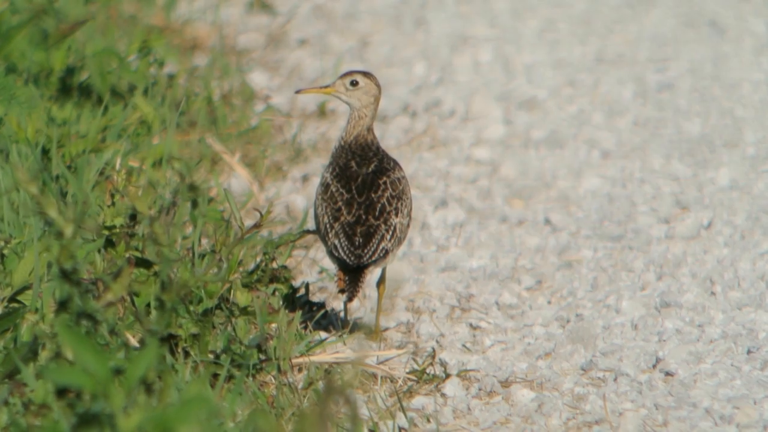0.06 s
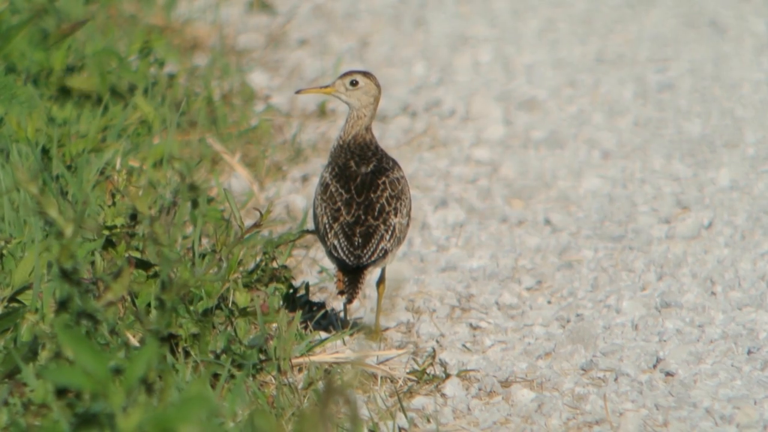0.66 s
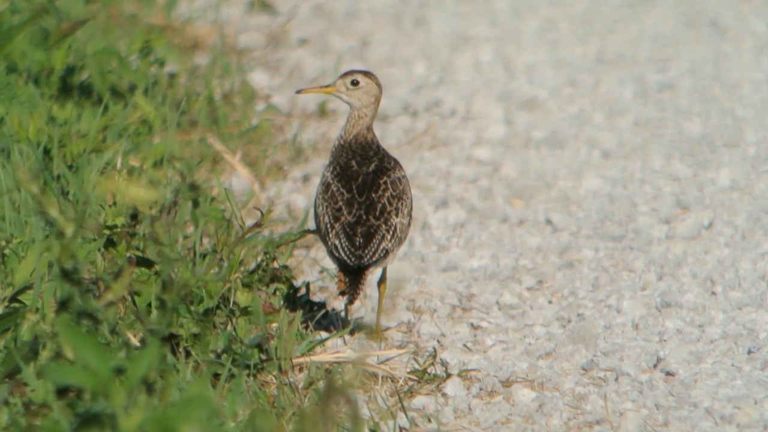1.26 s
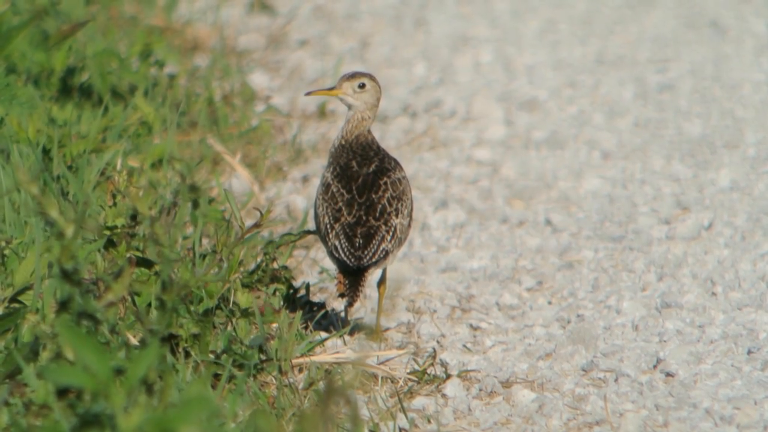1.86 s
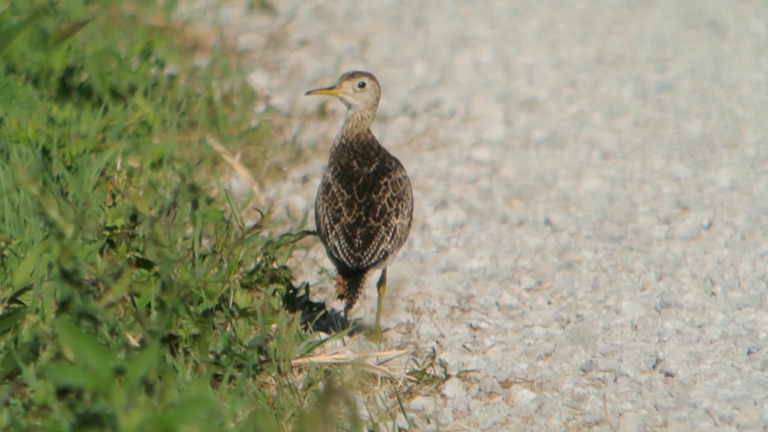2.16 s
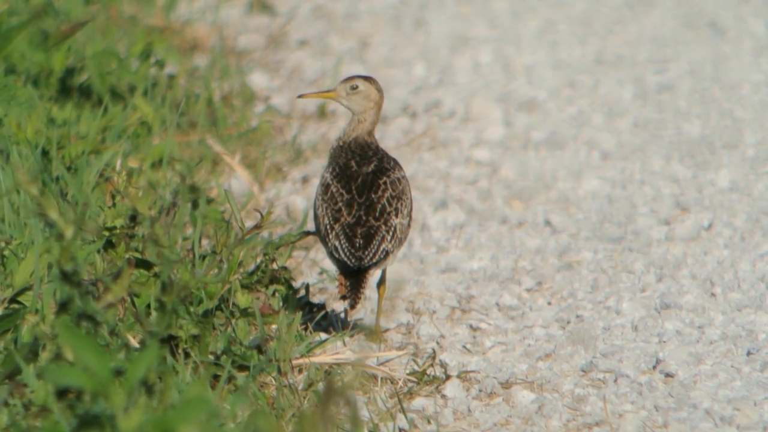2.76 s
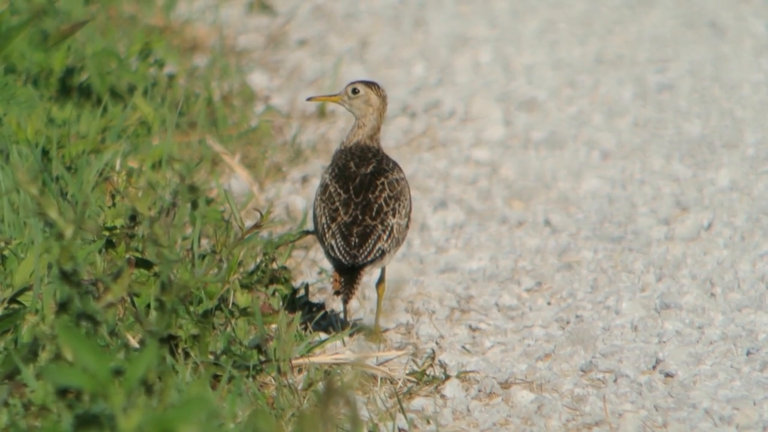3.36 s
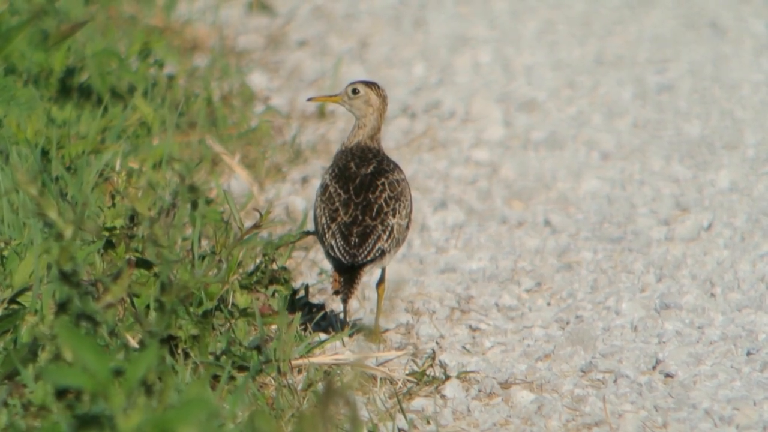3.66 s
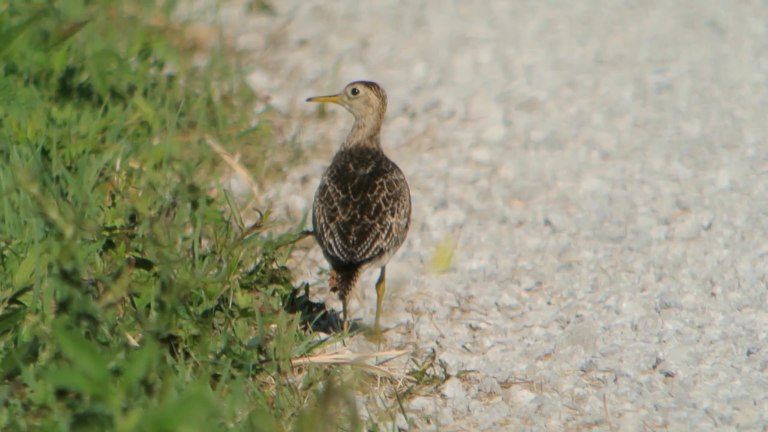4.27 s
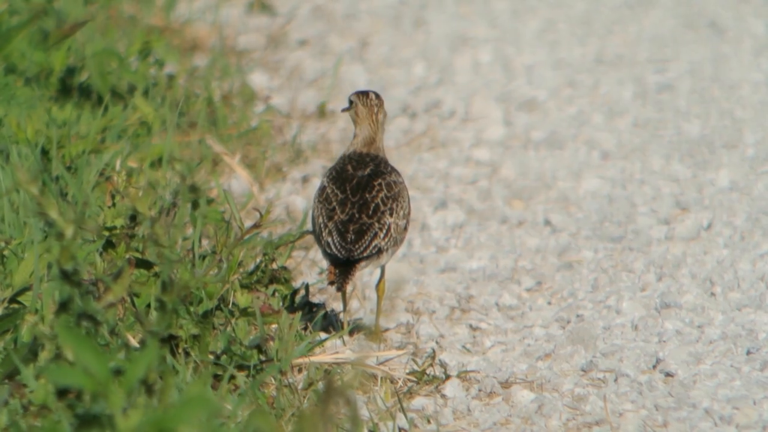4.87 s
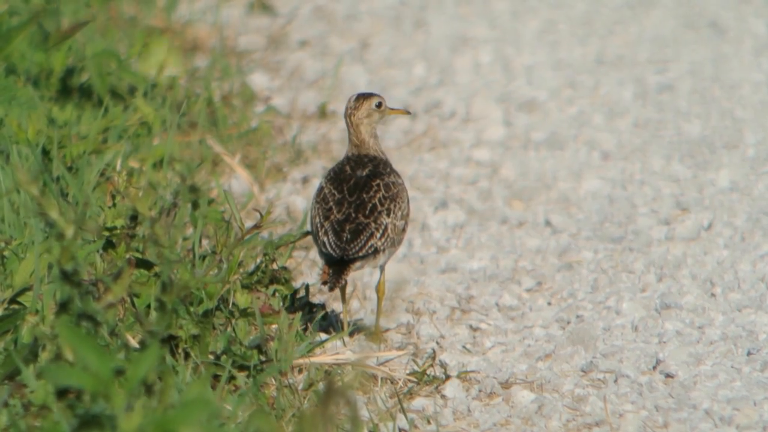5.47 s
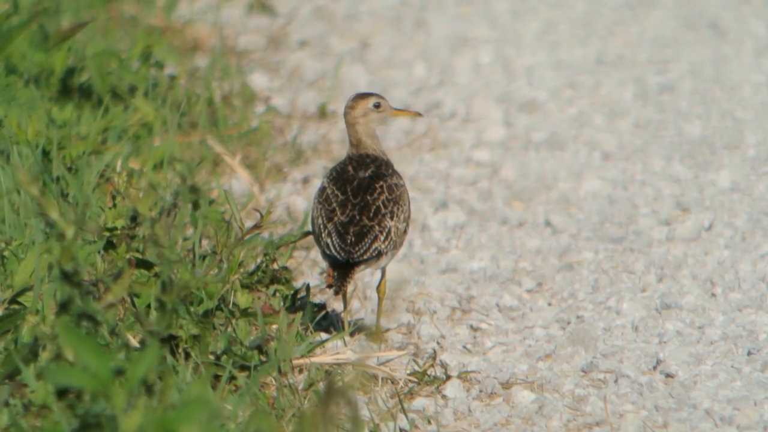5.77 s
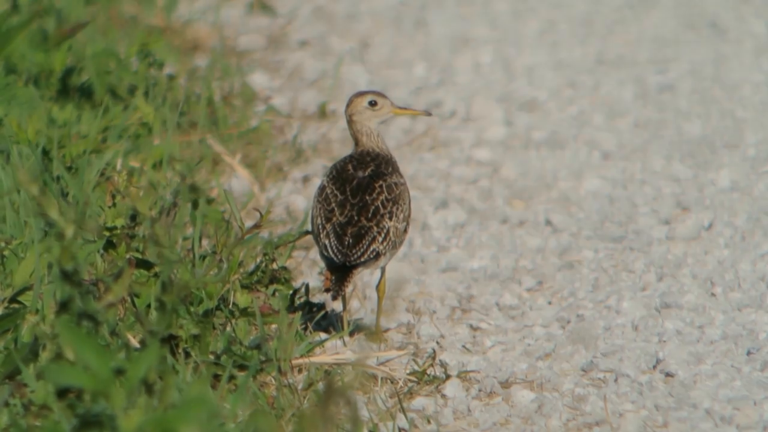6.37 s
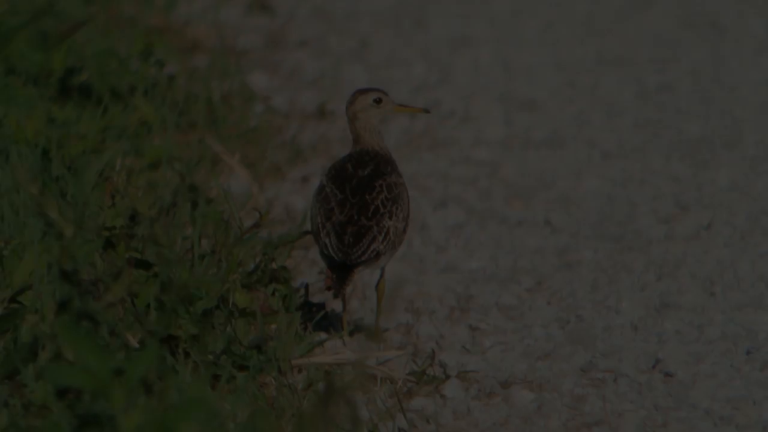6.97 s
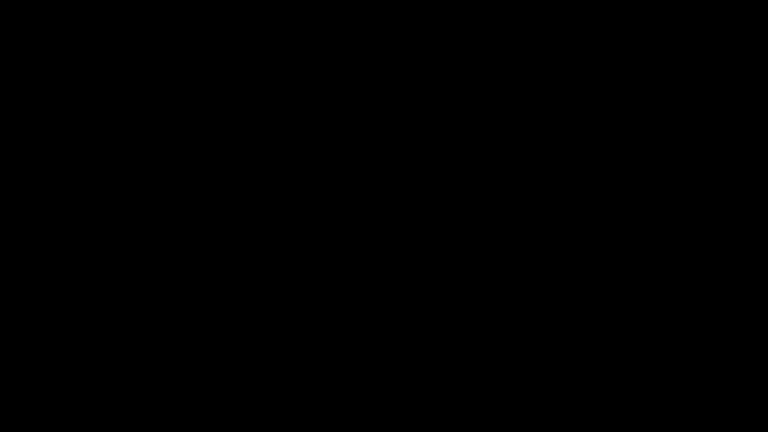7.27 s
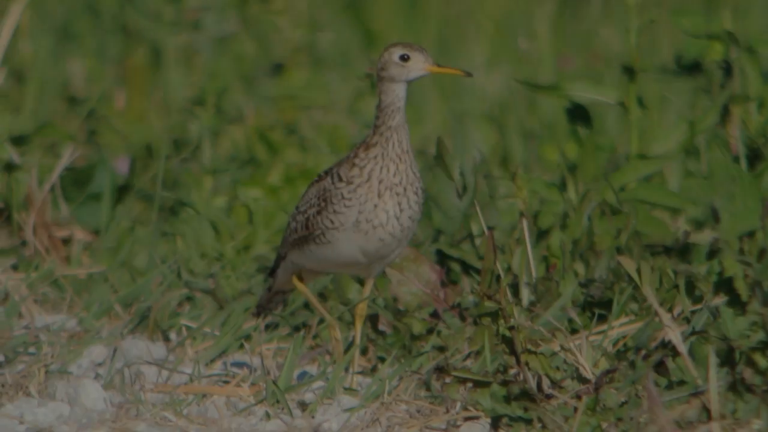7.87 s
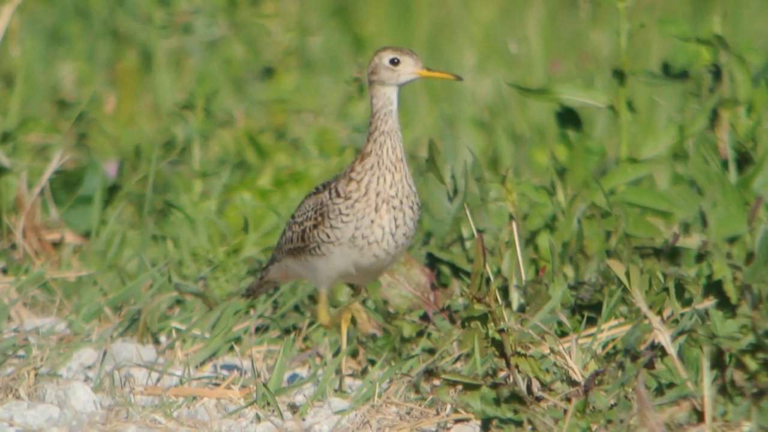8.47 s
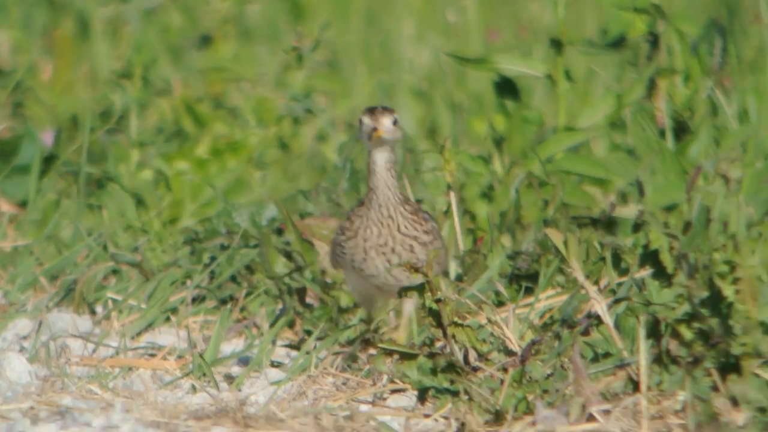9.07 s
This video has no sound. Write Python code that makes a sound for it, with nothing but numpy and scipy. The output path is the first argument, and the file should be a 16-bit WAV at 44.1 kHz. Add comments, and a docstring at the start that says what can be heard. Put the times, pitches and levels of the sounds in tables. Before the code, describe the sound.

Small birds twitter and chip over faint insects and wind bumps; the sound fades out, then returns with a closer bird piping rapid notes.

```python
"""Small birds by a grassland track

Birds twitter, chip and buzz in quick, quivering whistles around a gravel track, over bands of
insect noise and far trills. Puffs of wind bump the microphones. The sound fades out and in on a
closer spot, where one bird pipes a fast series of arched notes while another twitters across it."""
import sys
import numpy as np
from scipy import signal
from scipy.fft import rfft, irfft, next_fast_len
from scipy.io import wavfile
from scipy.ndimage import uniform_filter1d

SR = 44100
rng = np.random.default_rng(int(sys.argv[2]) if len(sys.argv) > 2 else 0)


def unload_audio(sound):
    """Save the sound as a 16-bit wav file, at the path given as the first command line argument."""
    columns = np.transpose(np.atleast_2d(sound))
    # keep every value between -1 and 1, then stretch to whole-number steps
    steps = np.round(np.clip(columns, -1, 1) * 32767)
    wavfile.write(sys.argv[1], SR, steps.astype(np.int16))


N = 401751
T = np.arange(N) / SR

# Tone of the air over the field. Each row: frequency in Hz, relative level in dB.
AIR_SPECTRUM = [(88, -1.5), (150, -32), (285, -4.5), (1610, -5.5), (3510, -4.5), (5200, -0.5), (6000, -6.5),
                (15000, -13)]
# Slow swells of the bed. Each row: time in seconds, air level in dB, wind rumble level in dB.
WEATHER = [(0, -52, -71), (1.7, -57, -68.5), (2.9, -54.5, -62.5), (5.497, -55.5, -60), (7.2, -59, -67.5),
           (7.699, -56, -38), (8.3, -55, -52), (9.1, -53, -53.5)]
# Insect choirs. Each row: centre in Hz, width in Hz, level in dB.
INSECT_BANDS = [(5390, 290, -83), (3607, 340, -67.5)]
# Far trills. Each row: start and length in seconds, pitch in Hz, notes per second, level in dB.
TRILLS = [(0, 0.48, 2620, 77, -52.5), (3.035, 0.44, 2770, 52, -55), (8.079, 0.085, 3470, 95, -47),
          (8.193, 0.81, 2713, 35.7, -53)]
# Three twitter songs. Each row is a syllable: end in seconds, first and last pitch in Hz,
# flick height as a share of the pitch, relative level in dB.
TUMBLE = [(.022, 7800, 7500, 0.16, -9), (.033, 8300, 7200, 0.12, -6), (.04, 9750, 7100, 0.089, -1.5),
          (.051, 4100, 5300, 0.043, -0.5), (.061, 5000, 4640, 0, -2), (.07, 6650, 7000, 0.0056, -1),
          (.077, 6340, 5900, .25, -3), (.086, 5100, 5760, 0.097, -0.5), (.125, 4400, 2430, .1, -5.5)]
CASCADE = [(.009, 8280, 7800, 0.043, -3.5), (.015, 7720, 7630, 0.314, 0), (.03, 9680, 8170, 0, -5.5),
           (.038, 8200, 7625, 0.183, 3.5), (.058, 5010, 4780, .25, -1), (.065, 4520, 4560, 0.015, -1.5),
           (.072, 6700, 6900, 0, 1.5), (.083, 5970, 5820, 0.21, 0), (.089, 5470, 5970, 0, 4.5),
           (.125, 4400, 2320, .04, -4.5)]
TWITTER = [(.01, 8200, 7450, 0, -9), (.016, 7100, 10200, 0, -3.5), (.036, 8330, 7940, .04, -3),
           (.043, 6800, 8760, 0, 0.5), (.058, 8250, 7300, 0.087, 0), (.072, 4750, 4330, 0.34, -7),
           (.082, 4540, 4670, 0.012, -3.5), (.092, 6600, 6300, 0, -1.5), (.103, 5380, 5360, 0.24, -4.5),
           (.112, 4870, 5140, 0.024, -3.5), (.14, 4400, 3130, .035, -6.5)]
# Bouts of twitters. Each row: song, pan in dB (left minus right), pitch factor,
# calls as pairs of start in seconds and level in dB.
BOUTS = [(TUMBLE, 5.3, 0.96, [(.105, -52), (.172, -47), (.339, -42.5), (.498, -40), (.659, -39.5),
         (.827, -40.5)]), (CASCADE, -3.5, 0.92, [(1.7, -49), (1.861, -49.5), (2.027, -49.5)]),
         (CASCADE, 3.1, 0.89, [(3.31, -56.5), (3.477, -52), (3.647, -51.5)]),
         (CASCADE, 5.3, 0.98, [(4.306, -42.5), (4.467, -42), (4.628, -42), (4.795, -43.5)]),
         (TUMBLE, -9.5, 1.04, [(5.173, -53), (5.322, -51), (5.467, -47), (5.615, -48)]),
         (CASCADE, -3, 0.93, [(6.335, -59), (6.497, -61)]), (TWITTER, 0, 1, [(8.631, -36), (8.825, -34.5),
         (9.017, -35.5)])]
# Far whistles. Each row: start and length in seconds, first and last pitch in Hz, level in dB.
WHISTLES = [(0.842, 0.093, 2263, 2320, -61), (3.274, 0.06, 4400, 4650, -53.5),
            (3.641, 0.025, 4400, 4700, -47.5), (3.831, 0.027, 4360, 4720, -46.5),
            (5.166, 0.047, 5000, 3900, -53.5), (5.72, 0.068, 2740, 2270, -62.5),
            (8.222, .07, 3225, 3210, -50.5), (8.25, .045, 3720, 3510, -47)]
# Contours of four calls. Each row: seconds into the call, base pitch in Hz, relative level in dB.
BUZZ_SHAPE = [(0, 6480, -3.5), (.008, 5950, 2.5), (.030, 5207, -1), (.066, 5100, -0.5), (.074, 3157, -18),
              (.085, 3350, -7.5), (.1, 3900, -1.5), (.106, 2940, -12.5), (.128, 2570, -12)]
LILT_SHAPE = [(0, 4470, -6), (.014, 4600, 6.5), (.03, 3600, -21.5), (.04, 4150, 1.5), (.057, 4700, 3),
              (.063, 3500, -9), (.078, 3146, 3), (.094, 2750, -17)]
CHIP_SHAPE = [(0, 4550, -19), (.006, 3630, 16), (.010, 2710, -6), (.012, 3100, 5), (.02, 2330, -23)]
PIP_SHAPE = [(0, 3814, -15), (.006, 4170, -6.5), (.016, 4303, -4.5), (.021, 3907, -6.5), (.025, 3300, -4.5),
             (.029, 2192, -5.5), (.039, 1490, -10)]
# Cues for buzzes and chips. Each row: start in seconds, level in dB, pan in dB, pitch factor.
BUZZES = [(1.344, -45, -6.5, 0.86), (4.091, -42.5, 2.5, 0.89), (8.083, -49.5, 0, 0.89),
          (8.268, -41, 0.5, 1), (8.442, -37, 0, 1.02)]
CHIPS = [(2.749, -53, -6.5, 0.96), (4.988, -57, -15, 0.99), (5.344, -53.5, -4.5, 1),
         (6.675, -51.5, -0.5, 0.91)]
# Cues for lilts and piping notes. Each row: start in seconds, level in dB, pitch factor.
LILTS = [(2.199, -59, 0.95), (2.375, -61.5, 0.97), (2.574, -62.5, 0.86), (5.924, -61, 0.87),
         (6.088, -65, 0.87), (6.228, -65, .88)]
PIPS = [(7.783, -40, 1.03), (7.847, -38.5, 0.98), (7.92, -36.5, 0.98), (8.002, -37, 0.98),
        (8.087, -34, 0.98), (8.16, -31.5, 1.01), (8.239, -29, 1), (8.32, -23.5, 0.95), (8.406, -27, 0.97),
        (8.49, -28, .99), (8.58, -27.5, 1.01), (8.67, -29, 1.03), (8.749, -23.5, 1.02), (8.84, -24.5, 0.99),
        (8.938, -26.5, 0.93), (9.037, -27.5, 0.91)]
# Wind bumps. Each row: peak time in seconds, relative level in dB, decay in seconds, pan in dB.
BUMPS = [(2.859, -49.5, 0.027, 0), (3.826, -51.5, .05, 1), (4.504, -45.5, 0.019, -1.5),
         (4.787, -41.5, 0.02, 6), (4.852, -46.5, 0.041, 0), (5.451, -44.5, .02, 3),
         (5.556, -38.5, 0.017, 11.5), (7.487, -32.5, 0.0097, -1), (7.66, -28, 0.025, 2),
         (7.744, -28.5, 0.013, 0.5), (7.883, -25, 0.004, 19), (7.962, -30, 0.012, 1),
         (8.068, -33, 0.014, 4.5), (8.23, -27.5, 0.025, -0.5), (8.287, -34.5, 0.033, 9),
         (8.308, -22, 0.0087, -3), (8.57, -35.5, .025, -16)]
# Far rasps. Each row: start and length in seconds, pitch in Hz, level in dB.
RASPS = [(3.614, 0.033, 3640, -51.5), (3.802, 0.028, 3315, -46.5), (8.164, 0.04, 2546, -51),
         (8.612, 0.023, 2955, -45)]
# Throat resonance of the piping bird. Each row: frequency in Hz, gain in dB.
THROAT = [(1400, -39), (2800, -17), (4200, -2), (6500, -11.5), (8300, -20), (10500, -12.5), (12600, -10),
          (15500, -13)]
# The fade out and in. Each row: time in seconds, linear gain.
FADE = [(6.45, 1), (7.32, 0.042), (7.35, 0.024), (8.35, 1)]


def undb(db):
    """Decibels to gain."""
    return 10 ** (np.asarray(db) / 20)


def unit(x):
    """Scale to rms 1."""
    return x / np.sqrt(np.mean(x ** 2))


def walk(rate, size):
    """Smooth random wander with spread near 1."""
    hold = max(int(SR / rate), 2)
    steps = np.repeat(rng.standard_normal(size // hold + 1), hold)
    return 1.304 * uniform_filter1d(uniform_filter1d(steps, hold), hold)[:size]


def colour(points, hz):
    """Gain of a (Hz, dB) spectrum at the given frequencies."""
    f, db = np.transpose(points)
    return undb(np.interp(np.log(hz + 1), np.log(f), db))


def noise(gain, size, alike):
    """Stereo noise with the spectrum gain(Hz); alike weights the part common to both sides."""
    white = rng.standard_normal((3, size))
    spectrum = rfft(white[:2] + alike * white[2])
    return unit(irfft(spectrum * gain(np.fft.rfftfreq(size, 1 / SR)), size))


def add(out, s, pair):
    """Mix a stereo sound in at s seconds."""
    i = int(np.clip(s * SR, 0, N - 1))
    out[:, i:i + pair.shape[1]] += pair[:, :N - i]


def sides(pan_db):
    """Left and right gains of constant power."""
    return unit(undb(np.array([[pan_db], [-pan_db]]) / 2))


def place(x, pan_db):
    """A bird off to one side is louder and earlier at that microphone."""
    lag_samples = 1 + 4.5 * np.tanh(pan_db / 4)
    size = next_fast_len(len(x) + 64)
    delay = np.exp(-2j * np.pi * np.fft.rfftfreq(size) * lag_samples)
    right = irfft(rfft(x, size) * delay, size)[:len(x)]
    return np.array([x, right]) * sides(pan_db)


def gesture(shape, pitch):
    """Time, pitch and gain of one call, with soft ends."""
    s, hz, db = np.transpose(shape)
    t = np.arange(int(s[-1] * SR)) / SR
    ends = np.clip(np.minimum(t, t[-1] - t) / 0.00028, 0, 1)
    return t, pitch * uniform_filter1d(np.interp(t, s, hz), size=44), undb(np.interp(t, s, db)) * ends


def cycles(hz):
    """Running phase of a pitch curve, in radians."""
    return 2 * np.pi * np.cumsum(hz) / SR


def field(dry, scatter_db, scatter_t60, tail_db, tail_t60):
    """Ground and grass scatter a call at once; the far field returns a tail."""
    t = np.arange(SR // 2) / SR
    response = 0
    for db, t60 in (scatter_db, scatter_t60), (tail_db, tail_t60):
        echoes = rng.standard_normal((2, len(t))) * undb(-60 * t / t60) * (t > .001)
        response = response + undb(db) * unit(echoes) / np.sqrt(len(t))
    return dry + signal.fftconvolve(dry, response, axes=1)[:, :N]


def meadow(air_db):
    """A bed of soft air and hiss, with shimmering bands of distant insects."""
    out = noise(lambda f: colour(AIR_SPECTRUM, f), N, alike=0.27) * undb(air_db + .5 * walk(8.7, N))
    for hz, width_hz, db in INSECT_BANDS:
        choir = noise(lambda f: 1 / (1 + (2 * (f - hz) / width_hz) ** 4), N, alike=0.55)
        shimmer_db = walk(2, N) + 2.5 * walk(90, N)
        out += choir * undb(db + shimmer_db)
    return out


def wind(rumble_db, gust_db=6.0, housing_hz=(160, 385, 470), width_hz=80, ring_db=1.5):
    """Eddies hit the two microphones almost independently; strong ones reach higher and ring the case."""
    def bump_spectrum(f, corner_hz):
        ring = 1 + sum(undb(ring_db) / (1 + (2 * (f - hz) / width_hz) ** 2) for hz in housing_hz)
        return ring * f / np.hypot(f, 65) / (1 + (f / corner_hz) ** 2.9)

    gusts = undb(rumble_db + gust_db * walk(35, N))
    out = noise(lambda f: f / (f + 25) / (1 + (f / 110) ** 2), N, alike=0.43) * gusts
    for s, db, decay_s, pan_db in BUMPS:
        t = np.arange(-2 * decay_s, 2 * decay_s, 1 / SR)
        eddy = noise(lambda f: bump_spectrum(f, corner_hz=1150 * undb(0.34 * db)), len(t), alike=0.51)
        envelope = np.exp(-abs(t) / decay_s / np.where(t < 0, 0.49, 1)) * np.hanning(len(t))
        add(out, s + t[0], undb(db) * unit(eddy * envelope) / 2 * sides(pan_db))
    return out


def chatter(count=190, softest_db=-61.86, range_db=3.12, low_hz=2800, high_hz=5800, mean_s=0.037):
    """Many distant birds slur short notes at random, from all sides."""
    out = np.zeros((2, N))
    for when, height, long, loud, bend, side in rng.random((count, 6)):
        size = int(mean_s * (.5 + long) * SR)
        slur = np.exp(0.27 * (1 - 3 * bend) * np.linspace(0, 1, size))
        hz = low_hz * (high_hz / low_hz) ** height * slur
        note = np.sin(cycles(hz)) * np.hanning(size)
        add(out, when * N / SR, undb(softest_db + range_db * loud) * place(note, 8 * (side - .5)))
    return field(out, scatter_db=3.0, scatter_t60=0.024, tail_db=-4.0, tail_t60=0.36)


def hoarse(hz, jitter):
    """A voice whose pitch shakes so fast that it turns to a rasp."""
    return np.sqrt(2) * np.sin(cycles(hz * (1 + jitter * walk(2500, len(hz)))))


def trill(size, hz, notes_per_s, upper_ratio=1.27, upper_db=-5, hoarse_ratio=1.6, hoarse_db=-9):
    """Tiny down-sweeps with a hoarse edge; a higher note falls between the low ones."""
    beat = np.arange(size) / SR * notes_per_s % 1
    pulse = np.sqrt(2) * np.sin(np.pi * beat) ** 4
    phase = cycles(hz * (1 + 0.288 * (.5 - beat) + 0.0202 * walk(300, size)))
    upper = np.roll(pulse * np.sin(upper_ratio * phase), int(SR / notes_per_s / 2))
    edge = undb(hoarse_db) * hoarse(np.full(size, hoarse_ratio * hz), jitter=.16)
    return (pulse * (np.sin(phase) + edge) + undb(upper_db) * upper) * signal.windows.tukey(size, .15)


def far_birds():
    """Slurred whistles, harsh rasps and trills, blurred by distance."""
    out = np.zeros((2, N))
    for s, length, first_hz, last_hz, db in WHISTLES:
        size = int(length * SR)
        whistle = np.sqrt(2) * np.sin(cycles(np.geomspace(first_hz, last_hz, size)))
        add(out, s, undb(db) * place(whistle * signal.windows.tukey(size, .6), pan_db=0))
    for s, length, hz, db in RASPS:
        size = int(length * SR)
        rasp = hoarse(np.full(size, hz), jitter=0.138) * signal.windows.tukey(size, .5)
        add(out, s, undb(db) * place(rasp, pan_db=-1.3))
    for s, length, hz, notes_per_s, db in TRILLS:
        add(out, s, undb(db) * place(trill(int(length * SR), hz, notes_per_s), pan_db=-0.81))
    return field(out, scatter_db=-3, scatter_t60=0.13, tail_db=-3.5, tail_t60=0.62)


def syrinx(hz, gain, quiver, flutter_db, octave_db):
    """A whistle whose pitch and strength quiver quickly, with a weak octave."""
    hz = hz * (1 + quiver * walk(600, len(hz)))
    phase = cycles(hz)
    tone = np.sin(phase) + undb(octave_db) * np.sin(2 * phase) * (hz < SR / 4)
    return np.sqrt(2) * gain * undb(flutter_db * walk(450, len(hz))) * tone


def twitter(song, pitch, flicks_per_s=190, taper=0.42, low_db=-11, sizzle_db=-12, sizzle_hz=6000):
    """Tiny slurs and upward flicks over a hoarse lower voice and a sizzle of air, never twice alike."""
    syllables, start = [], 0
    for end, first_hz, last_hz, flick, db in song:
        size = max(int((end - start) * SR), 32)
        sharp, loud = rng.standard_normal(2)
        glide = np.geomspace(first_hz, last_hz, size) * pitch * (1 + 0.0184 * sharp)
        # whole flicks fill each syllable; the higher they reach, the more they chop it
        arch = abs(np.sin(np.linspace(0, np.pi, size) * max(round(size / SR * flicks_per_s), 1)))
        gain = signal.windows.tukey(size, taper) * (1 - np.clip(4 * flick, 0, 1) * (1 - arch))
        clear = syrinx(glide * (1 + flick * arch), gain, quiver=0.024, flutter_db=2.5, octave_db=-20.5)
        low = hoarse(np.maximum(.72 * glide, 3600), jitter=0.159)
        air = noise(lambda f: (f / sizzle_hz) ** 3 / (1 + (f / sizzle_hz) ** 2) ** 2, size, alike=0)[0]
        rasp_gain = np.minimum(glide / sizzle_hz, 1) ** 2 * signal.windows.tukey(size, taper / 2)
        rasp = (undb(low_db) * low + undb(sizzle_db) * air) * rasp_gain
        syllables.append(undb(db + 1.3 * loud) * (clear + rasp))
        start = end
    return np.concatenate(syllables)


def buzz(chop_pitch, chops_per_s=98, sweep=0.31):
    """A call chopped into quick down-sweeps, ending in a plain whistle that flicks up and falls."""
    t, hz, gain = gesture(BUZZ_SHAPE, pitch=0.97)
    depth = np.clip((.072 - t) / .006, 0, 1)
    beat = chops_per_s * t % 1
    hz = hz * (1 + depth * (chop_pitch - 1 + sweep * (.5 - beat)))
    gain = gain * (1 - depth * np.cos(np.pi * beat) ** 2)
    return syrinx(hz, gain, quiver=0.016, flutter_db=2.5, octave_db=-18)


def lilt(pitch):
    """A pure whistle that dips, rises and falls away."""
    _, hz, gain = gesture(LILT_SHAPE, pitch)
    return np.sqrt(2) * gain * np.sin(cycles(hz))


def chip(pitch):
    """One short, rough downward flick of the voice."""
    _, hz, gain = gesture(CHIP_SHAPE, pitch)
    return syrinx(hz, gain, quiver=0.095, flutter_db=7.0, octave_db=-17)


def songbirds():
    """Twitters, chips, lilts and buzzes; birds before the fade are further off and more smeared."""
    far, near = np.zeros((2, 2, N))
    fade_bottom_s = FADE[2][0]
    for song, pan_db, pitch, calls in BOUTS:
        for s, db in calls:
            add(near if s > fade_bottom_s else far, s, undb(db) * place(twitter(song, pitch), pan_db))
    for s, db, pan_db, pitch in CHIPS:
        add(far, s, undb(db) * place(chip(pitch), pan_db))
    for s, db, pitch in LILTS:
        add(far, s, undb(db) * place(lilt(pitch), pan_db=-1.1))
    for s, db, pan_db, pitch in BUZZES:
        add(near if s > fade_bottom_s else far, s, undb(db) * place(buzz(pitch), pan_db))
    return (field(far, scatter_db=-2.5, scatter_t60=0.034, tail_db=-3.5, tail_t60=0.2)
            + field(near, scatter_db=-8, scatter_t60=0.089, tail_db=-24, tail_t60=0.2))


def piper(db_per_octave=-6, waver=0.0063, crack=0.067, flutter_db=2.5, linger=0.252):
    """Each close note arches, cracks and plunges, sweeping its overtones through the throat resonance."""
    out = np.zeros((2, N))
    for (s, db, pitch), (tilt, drawl) in zip(PIPS, rng.standard_normal((len(PIPS), 2))):
        t, hz, gain = gesture(PIP_SHAPE, pitch)
        # soft notes last longer, stay flatter and fade into the plunge
        effort = np.clip((db + 46) / 20, .2, 1)
        stretch = 1 + linger * (1 - effort) + 0.062 * drawl
        shape_t = np.arange(0, t[-1], 1 / SR / stretch)
        progress = shape_t / t[-1]
        hz = np.interp(shape_t, t, hz / hz.max()) ** effort * hz.max()
        gain = np.interp(shape_t, t, gain) * effort ** progress
        # every note leans its own way, soft ones upward; the voice roughens as the pitch drops
        lean = 0.032 * (tilt / 2 + 2 * (1 - effort)) * (2 * progress - 1)
        rough = waver + crack * (1 - hz / hz.max())
        hz = hz * (1 + lean + rough * walk(900, len(hz)))
        gain = gain * undb(flutter_db * walk(363, len(hz)))
        tone = 0
        for k in range(1, 7):
            harmonic_gain = undb(db_per_octave * np.log2(k)) * colour(THROAT, k * hz) * (k * hz < SR / 2)
            tone = tone + harmonic_gain * np.sin(k * cycles(hz))
        add(out, s, place(np.sqrt(2) * undb(db) * gain * tone, pan_db=-0.31))
    return field(out, scatter_db=-11.5, scatter_t60=0.083, tail_db=-16.0, tail_t60=0.27)


def scene():
    """Birds over the bed of meadow and wind."""
    s, air_db, rumble_db = np.transpose(WEATHER)
    birds = songbirds() + piper() + far_birds() + chatter()
    return birds + meadow(np.interp(T, s, air_db)) + wind(np.interp(T, s, rumble_db))


def record(dry, top_hz=15850):
    """The mix fades out and back in; the top is cut steeply."""
    faded = dry * np.interp(T, *np.transpose(FADE))
    return signal.sosfilt(signal.ellip(12, .1, 80, top_hz, fs=SR, output="sos"), faded)


dry = scene()
out = record(dry)
unload_audio(out)
```